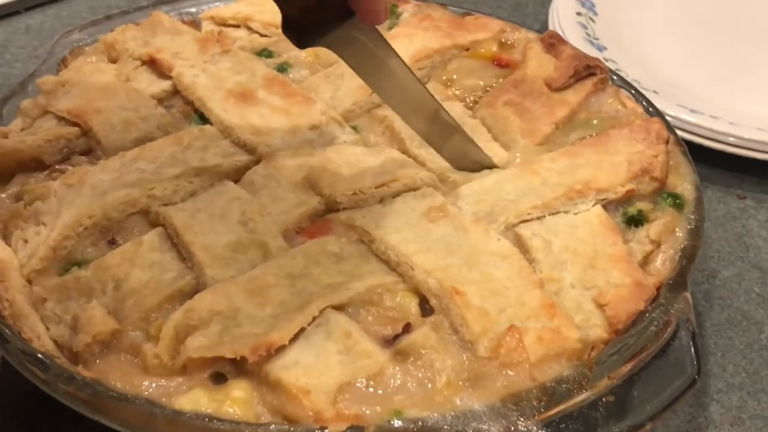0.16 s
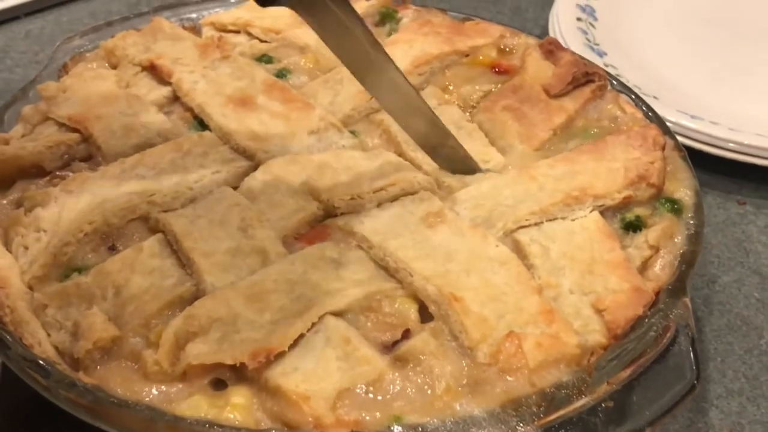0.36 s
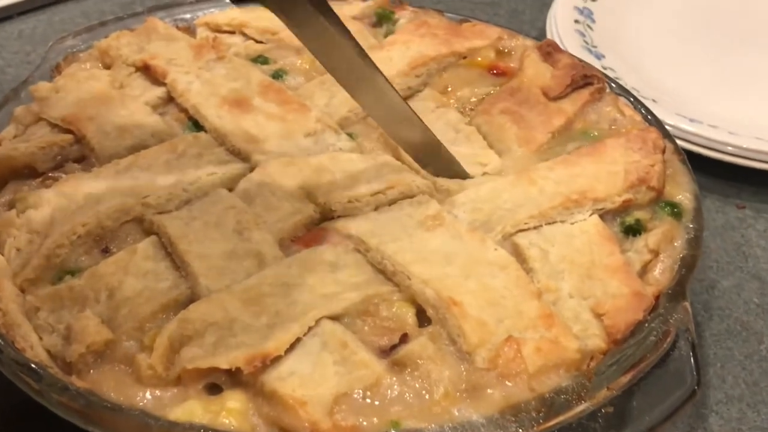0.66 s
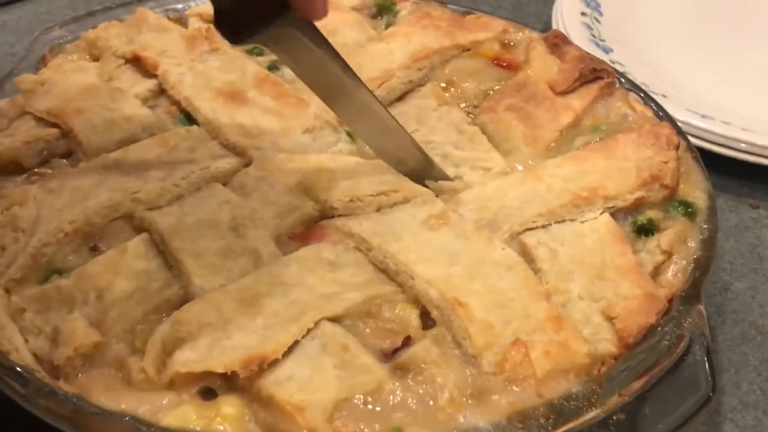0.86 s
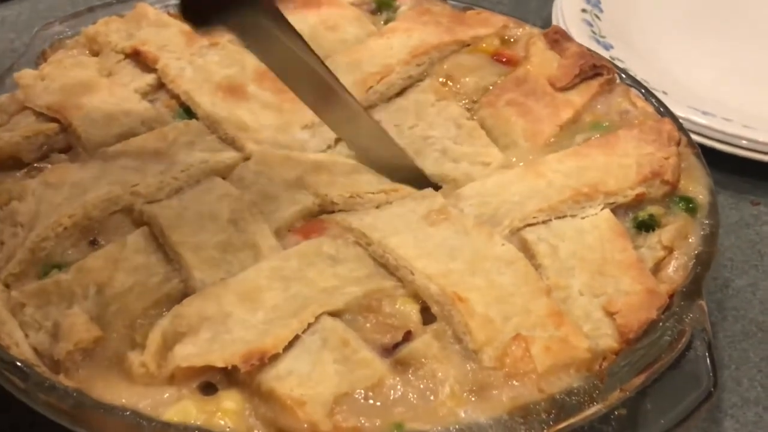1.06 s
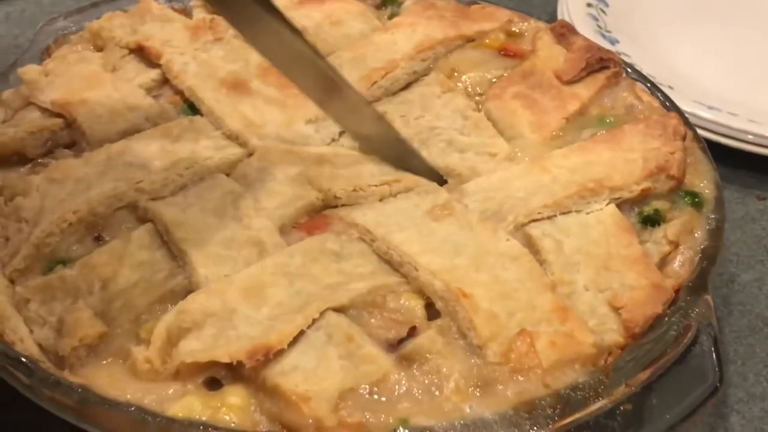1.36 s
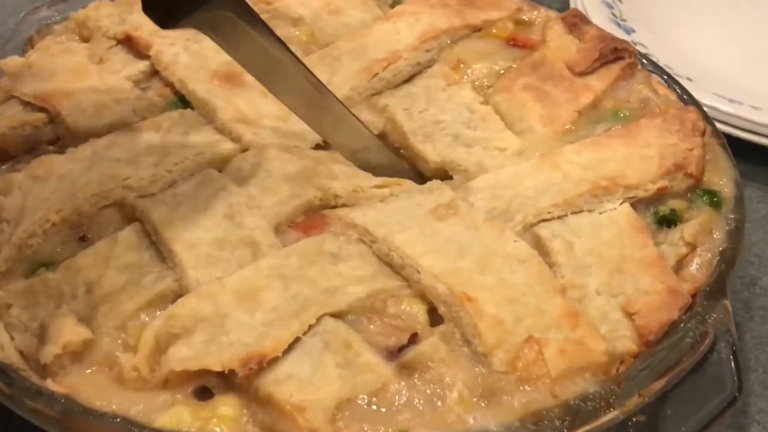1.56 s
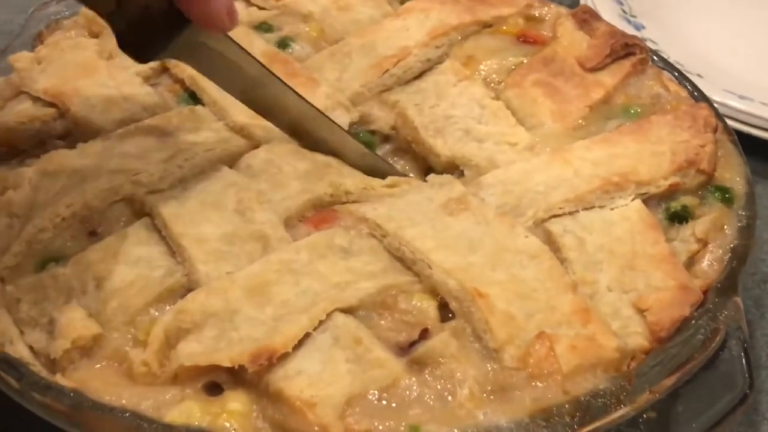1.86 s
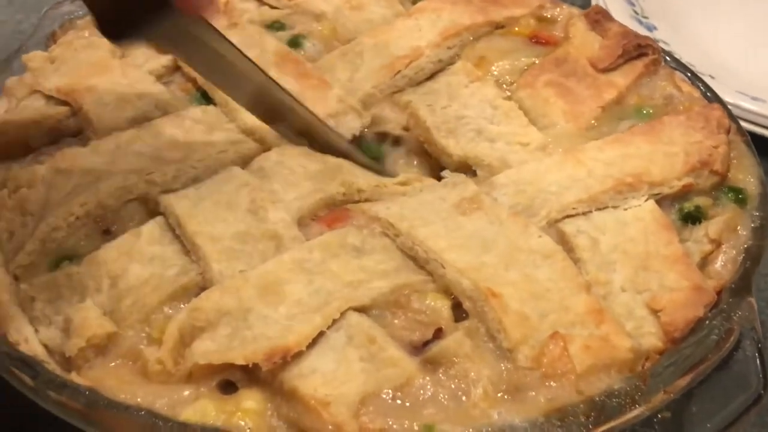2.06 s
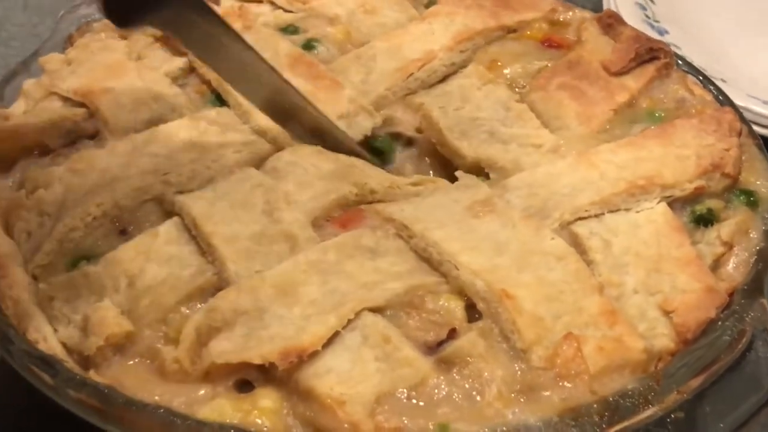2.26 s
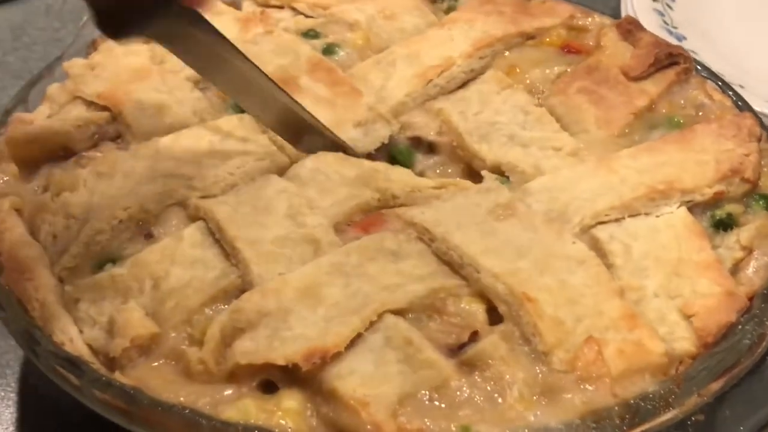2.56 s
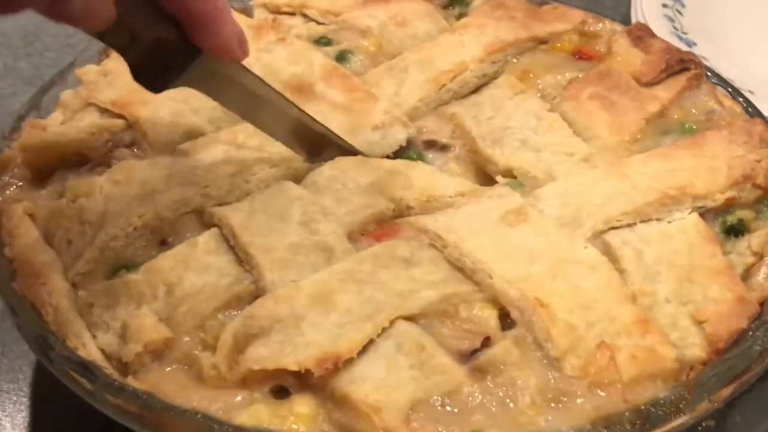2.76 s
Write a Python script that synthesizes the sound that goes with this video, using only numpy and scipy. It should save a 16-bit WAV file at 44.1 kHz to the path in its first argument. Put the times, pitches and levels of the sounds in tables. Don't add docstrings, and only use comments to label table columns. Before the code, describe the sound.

Knife stabbing a crisp baked pie crust, with sharp clinks on glass and soft rasps between

```python
import sys
import numpy as np
from scipy import signal
from scipy.fft import rfft, irfft
from scipy.io import wavfile
from scipy.ndimage import uniform_filter1d

SR = 44100
rng = np.random.default_rng(int(sys.argv[2]) if len(sys.argv) > 2 else 0)


def voltage_ratio(level):
    return 10 ** (np.asarray(level, float) / 20)


def materialize(psi):
    bounded = np.clip(np.atleast_2d(psi).T, -1, 1)
    quanta = np.round(bounded * 32767).astype(np.int16)
    wavfile.write(sys.argv[1], SR, quanta)


N = 127890

RISE_S = .0002


def at_hz(points, hz):
    table = np.array(points)
    return np.interp(np.log(hz), np.log(table[:, 0]), table[:, 1])


def rms_one(x):
    return x / np.sqrt(np.mean(x ** 2) + 1e-20)


def ring(clicks, hz, t60):
    decay = voltage_ratio(-60 / (t60 * SR))
    turn = 2 * np.pi * hz / SR
    return signal.lfilter([0, np.sin(turn)], [1, -2 * decay * np.cos(turn), decay * decay], clicks + 1e-18)


def colour(x, spectrum):
    hz = np.arange(N // 2 + 1) * SR / N + 1
    gain = voltage_ratio(at_hz(spectrum, hz)) * (hz > spectrum[0][0] / 2)
    return rms_one(irfft(rfft(x) * gain, N))


def smooth_twice(x, size):
    return uniform_filter1d(uniform_filter1d(x, size=size), size=size)


def add(out, s, x):
    i = max(int(s * SR), 0)
    out[i:i + len(x)] += x[:N - i]


def fridge():
    # (pitch_hz, width_hz, level_db)
    hum_lines = [(72.9, 5.3, -51.5), (128.3, 28, -50.5), (206.5, 21, -51), (236.53, 12.3, -44.5),
                 (280.7, 95, -49.5), (355.8, 12.7, -56), (828, 23, -65)]
    # (pitch_hz, level_db per Hz)
    air = [(18, -37), (30, -9.5), (259, -12.5), (962, -24), (1720, -32.5), (1860, -29.5), (7270, -40),
           (14800, -38.5), (16000, -42)]
    hum = np.zeros(N)
    for hz, width_hz, db in hum_lines:
        t60 = 2.4 / width_hz
        noise = rng.standard_normal(N + SR)
        line = ring(ring(noise, hz, t60), hz, t60)[SR:]
        hum += voltage_ratio(db) * rms_one(line)
    return hum + voltage_ratio(-48) * colour(rng.standard_normal(N), air)


def counter():
    # (swell_top_s, level_db, pitch_hz)
    rocks = [(0.029, -36, 58), (0.112, -36, 53.4), (0.419, -43, 57), (0.748, -37.5, 51.6),
             (1.066, -41, 55.5), (1.378, -40.5, 55.5), (1.715, -36, 52.3), (1.769, -48, 49),
             (2.04, -47, 55.4), (2.11, -45, 59.3), (2.35, -42, 51.3), (2.655, -35.5, 59), (2.31, -43, 123),
             (2.522, -48.5, 151), (2.667, -41.5, 132)]
    swell_s = 0.026
    t, out = np.arange(N) / SR, np.zeros(N)
    for s, db, hz in rocks:
        swell = np.exp(-.5 * ((t - s) / swell_s) ** 2)
        out += voltage_ratio(db + 5.0) * swell * np.sin(2 * np.pi * hz * (t - s))
    return out


def kitchen(x):
    # (pitch_hz, level_db)
    wall_colour = [(300, 2), (1500, 2.5), (2550, 4.5), (3200, -2), (5400, -0.8), (8300, -0.5), (12500, -1),
                   (16000, -3)]
    wall_cut_hz, low_t60_s, top_t60_s = 7000, .45, .22
    t, noise = np.arange(SR // 2) / SR, rng.standard_normal(SR // 2)
    dull = signal.sosfilt(signal.butter(2, wall_cut_hz, fs=SR, output="sos"), noise)
    tail = dull * voltage_ratio(-60 * t / low_t60_s) + (noise - dull) * voltage_ratio(-60 * t / top_t60_s)
    tail = tail * np.clip((t - .003) / 0.0039, 0, 1)
    gain = voltage_ratio(at_hz(wall_colour, np.arange(len(t) // 2 + 1) * SR / len(t) + 1))
    echoes = irfft(rfft(tail) * gain, len(t)) * (t > .002)
    return signal.fftconvolve(x, echoes)[:N]


def thuds():
    # (start_s, level_db, way: negative when pulled first)
    knocks = [(.004, -20, 1), (0.3498, -23, 1), (0.6926, -28.5, -1), (1.0013, -20.5, 1), (1.3502, -35, -1),
              (1.709, -26, 1), (1.9985, -20.5, 1), (2.3044, -25, 1), (2.491, -26.5, 1), (2.514, -31, 1),
              (2.6048, -18.5, 1)]
    # (pitch_hz, level_db, t60_s)
    dish = [(211.3, -7, 0.08), (300, -9, 0.16), (379, 13, 0.011), (480, -62, 0.0047)]
    out, t = np.zeros(N), np.arange(6000) / SR
    swing = sum(voltage_ratio(db - 60 * t / t60) * np.cos(2 * np.pi * hz * t) for hz, db, t60 in dish)
    swing = swing * (1 - np.exp(-t / 0.0011))
    for s, db, way in knocks:
        add(out, s, np.sign(way) * voltage_ratio(db) * swing)
    return out


def clinks():
    # (start_s, peak_db, main_ring_hz, upper_rings_db, top_rings_db)
    hits = [
        (.0006, -6.5, 4916, 1, -9.5),
        (0.3474, -10.5, 4990, 0.5, -6),
        (0.6899, -27.5, 5070, 0, -20),
        (0.998, -8, 5200, 0.5, -3.5),
        (1.3049, -21.5, 5190, -14, -25),
        (1.7067, -14.5, 5530, -2, -3.5),
        (1.9953, -5.5, 5505, 1, -3.5),
        (2.301, -8, 5530, -4.5, -7.5),
        (2.602, 1, 5516, -2.5, -6),
    ]
    # (pitch_hz, level_db, t60_s, follow: how far it follows the main ring, 0-1)
    blade = [(1635, -25.5, 0.011, 0), (2615, -19.5, 0.02, 0.84), (3020, -13, 0.0046, 1),
             (4600, -26, 0.015, 0.75), (5484, -4, 0.0076, 0.83), (6046, -9.5, 0.0034, 0.46),
             (7530, -16, 0.0057, 0), (8370, -10, 0.0099, 0.84), (9340, -16, 0.0043, 1),
             (12300, -3.5, 0.0037, 0.43), (13040, -7, 0.004, 0.4), (3050, -20, 0.0027, 0.94),
             (12670, -3.5, 0.002, 0.24), (15200, -12.5, 0.0051, 0.1)]
    main_hz, upper_hz, top_hz = 5460, 7000, 10500
    contact_s, grit, crack_db, mode_spread_db = .0004, .4, -9, 1.5
    echo_s, echo_db = .0036, -10
    out, t = np.zeros(N), np.arange(6000) / SR
    touch = np.exp(-t / contact_s) * (1 - np.exp(-(t / RISE_S) ** 2))
    for lag, loss_db in [(0, 0), (echo_s, echo_db)]:
        for s, db, hz, upper_db, top_db in hits:
            noise, luck = rng.standard_normal(6000), rng.standard_normal(len(blade))
            gritty = noise * touch
            crack = np.diff(gritty, prepend=0) * .4 + gritty
            for k, (mode_hz, mode_db, t60, follow) in enumerate(blade):
                f = mode_hz * (hz / main_hz) ** follow
                push = touch * np.cos(2 * np.pi * f * t + luck[k])
                x = ring(push + grit * crack, f, t60)
                extra_db = top_db if mode_hz > top_hz else upper_db * (mode_hz > upper_hz)
                level_db = db + loss_db + mode_db + extra_db + mode_spread_db * luck[-k]
                add(out, s + lag, voltage_ratio(level_db) * x / np.abs(x).max())
            add(out, s + lag, voltage_ratio(db + loss_db + crack_db) * crack)
    return out


def snaps():
    # (start_s, peak_db, pitch_hz, length_s)
    flakes = [(.02, -45, 12000, .001), (0.038, -34, 13100, 0.00092), (0.047, -44, 8000, 0.0018),
              (.055, -31, 14000, .001), (0.152, -36, 10500, 0.001), (0.476, -35, 12000, 0.0014),
              (0.635, -42, 11000, 0.0013), (0.644, -34, 3430, 0.0018), (0.657, -28, 12100, .0005),
              (0.679, -34, 4800, 0.0009), (0.689, -30.5, 3000, 0.0041), (.716, -42, 2500, 0.00089),
              (0.7384, -42, 2520, .001), (0.744, -51, 2500, 0.00085), (0.7934, -36.5, 3400, 0.0014),
              (0.9725, -28, 11500, 0.0005), (1.2935, -31.5, 4200, 0.00079), (1.3, -34, 6000, 0.0014),
              (1.3122, -25, 3430, 0.0013), (1.3141, -30, 2880, .0008), (1.325, -36.5, 5000, 0.0023),
              (1.342, -31, 10000, 0.00074), (1.4494, -44, 8350, .001), (1.476, -39.5, 8200, 0.0052),
              (1.625, -45, 11000, .0008), (1.652, -43, 5500, 0.0018), (1.6587, -24, 3630, 0.0028),
              (1.659, -22.5, 8000, .003), (1.94, -42, 10000, 0.0011), (1.946, -30, 3380, 0.0015),
              (1.951, -35, 3500, 0.00079), (1.9546, -34, 2600, 0.00088), (1.961, -30, 2900, 0.00083),
              (2.14, -31, 6400, 0.0066), (2.2262, -30, 3500, 0.0012), (2.229, -26.5, 4930, 0.002),
              (2.254, -37, 7500, 0.00092), (2.281, -34, 1930, 0.0018), (2.336, -27.5, 11300, 0.00092),
              (2.4882, -25, 2370, 0.0015), (2.495, -29, 2040, 0.0038), (2.5765, -27, 6100, 0.00089),
              (2.589, -26, 1820, 0.0015), (2.597, -39, 5800, .002), (2.845, -40, 2980, 0.00059),
              (2.863, -28.5, 3430, 0.00075), (2.8675, -27, 3430, .0006), (2.8734, -29, 3200, 0.00058),
              (2.877, -33, 5300, 0.00092), (2.895, -32, 1620, 0.007)]
    ring_cycles, lift_db = 6.2, 1.5
    out, t = np.zeros(N), np.arange(1200) / SR
    for s, db, hz, length in flakes:
        burst = rng.standard_normal(1200) * (1 - np.exp(-t / RISE_S)) * np.exp(-t / length)
        pitched = rms_one(ring(burst, hz, ring_cycles / hz))
        x = pitched + 0.28 * rms_one(np.diff(burst, prepend=0))
        add(out, s, voltage_ratio(db + lift_db) * x / np.abs(x).max())
    return out


def strokes(rows, edge_s, bands, filling):
    attack_s, release_s = edge_s
    t, out, lag = np.arange(N) / SR, np.zeros(N), int(0.013 * SR)
    for s, length, db, tilt_db, squash_db in rows:
        attack = np.sin(np.pi / 2 * np.clip((t - s) / attack_s, 0, 1)) ** 2
        past_hold = np.maximum(t - s - length + release_s, 0)
        shape = attack * np.exp(-2 * (past_hold / release_s) ** 2)
        for k, band in enumerate(bands):
            out += voltage_ratio(db + tilt_db * (k - 2.5)) * shape * band
        late = uniform_filter1d(np.pad(shape, (lag, 0))[:N], size=600)
        out += voltage_ratio(squash_db) * late * filling
    return out


def crust():
    # (start_s, length_s, level_db, tilt_db
    # per octave, filling_squash_db)
    pushes = [(.004, 0.072, -44, -2.5, -38.5), (.308, 0.092, -47, 0, -44.5), (.632, 0.028, -56, 5.5, -48),
              (.641, 0.064, -42, -2, -46.5), (.94, 0.062, -43.5, -2, -45.5), (.978, 0.049, -35, -1, -71),
              (1.302, 0.05, -38.5, -0.5, -47), (1.622, 0.062, -40.5, -2.5, -41),
              (1.64, 0.087, -41, 0.5, -50), (1.938, 0.038, -44, -3.5, -60),
              (1.97, 0.079, -39.5, -3.7, -42.5), (2.278, 0.07, -46, -8.5, -57),
              (2.3, 0.079, -66.5, 10, -55), (2.565, 0.039, -41.5, -0.7, -37),
              (2.587, 0.059, -37.5, -4.5, -45), (2.857, 0.081, -44, -1, -58),
              (1.32, 0.033, -49, -13, -43.5), (1.655, 0.041, -45.5, -10.5, -38.5),
              (2.483, 0.046, -47, -8, -44), (.468, 0.059, -60.5, 3.5, -65),
              (2.22, 0.073, -58, -10.5, -48.5), (2.625, 0.091, -52.5, -1, -50)]
    # (start_s, length_s, level_db, tilt_db per octave, filling_squash_db)
    pulls = [
        (.135, 0.15, -60, 4, -77),
        (.46, 0.14, -59.5, 3.5, -69),
        (.785, 0.13, -47.5, 0.5, -74),
        (1.105, 0.17, -52, 1, -55),
        (1.465, 0.15, -49, -2.3, -53.5),
        (1.81, 0.11, -44.5, -1.8, -52),
        (2.09, 0.27, -46, -1.5, -59),
        (2.39, 0.18, -45, -0.8, -58.5),
        (2.7, 0.17, -46, -2.3, -57),
    ]
    # (pitch_hz, level_db, t60_s)
    rasp = [(5640, -16, 0.01), (8100, -16.5, 0.005), (10780, -20.5, 0.015), (12360, -17.5, 0.0034),
            (15800, -16, 0.0058)]
    # (pitch_hz, level_db per Hz)
    crust_colour = [(290, -16), (500, -74), (1440, -6.5), (1600, -7.5), (2130, -8), (2690, -6.5),
                    (3750, -2.5), (16000, -3.5)]
    flakes_per_s, flake_spread_db, rub_share = 5000, 3, .8
    patch_db, swell_db, lump_db = 2, 2.5, 3.5

    clump = np.repeat(rng.standard_normal(N // 128 + 1), 128)[:N]
    sizes = voltage_ratio(flake_spread_db * np.minimum(rng.exponential(1, N), 4)) * rng.choice([-1, 1], N)
    breaks = rng.random(N) < flakes_per_s * voltage_ratio(2.2 * clump) / SR
    flakes = rms_one(sizes * breaks)
    rub = flakes + rub_share * rng.standard_normal(N)
    sing = sum(voltage_ratio(db) * rms_one(ring(rub, hz, t60)) for hz, db, t60 in rasp)

    grain = rfft(colour(rub, crust_colour) + sing)
    octave = np.clip(np.log2((np.arange(len(grain)) + 1) * SR / N / 1000), 0, 4)
    patches = smooth_twice(rng.standard_normal((5, N)), 300)
    swells = smooth_twice(rng.standard_normal((5, N)), 2500)
    bands = []
    for k in range(5):
        band = irfft(grain * np.clip(1 - abs(octave - k), 0, 1), N)
        patch = rms_one(patches[k] + patches.mean(0) / 2)
        bands.append(band * voltage_ratio(patch_db * patch + swell_db * rms_one(swells[k])))

    soft = signal.sosfilt(signal.butter(2, (122, 850), "band", fs=SR, output="sos"), flakes)
    filling = rms_one(soft * voltage_ratio(lump_db * rms_one(patches[0])))
    return strokes(pushes, (.012, .022), bands, filling) + strokes(pulls, (.04, .09), bands, filling)


def scene():
    hits = clinks() + thuds()
    steady = snaps() + crust()
    steady = steady + voltage_ratio(-45) * kitchen(hits + steady) + counter() + fridge()
    top_cut = signal.ellip(10, .5, 50, 15800, fs=SR, output="sos")
    return (hits + signal.sosfilt(top_cut, steady))[None]


def low_pass(x):
    return signal.sosfilt(signal.butter(12, 16740, fs=SR, output="sos"), x)


def record(dry):
    rounded = 2 * np.tanh(dry / 2)
    x = signal.sosfilt(signal.butter(3, 40, "high", fs=SR, output="sos"), rounded)
    x = signal.sosfilt(signal.ellip(10, .5, 70, 16650, fs=SR, output="sos"), x)
    return low_pass(x)


dry = scene()
out = record(dry)
materialize(out)
```